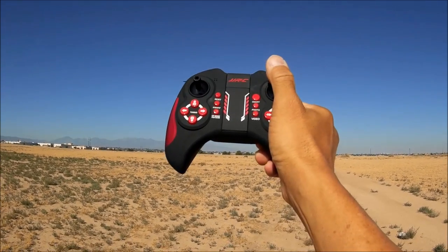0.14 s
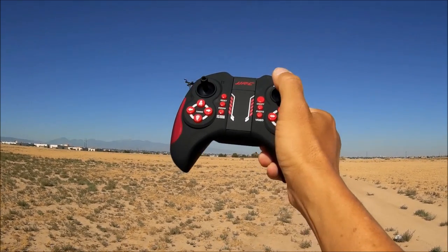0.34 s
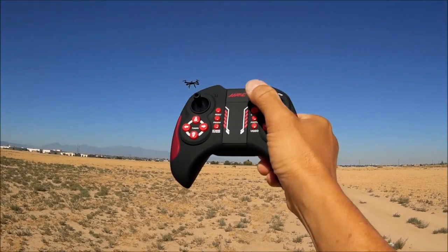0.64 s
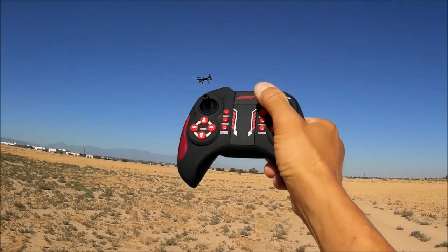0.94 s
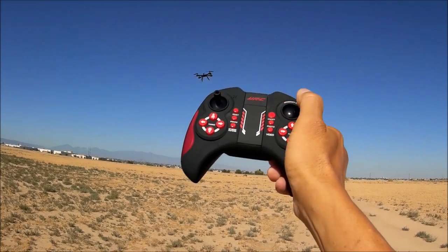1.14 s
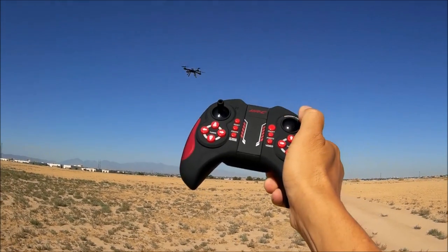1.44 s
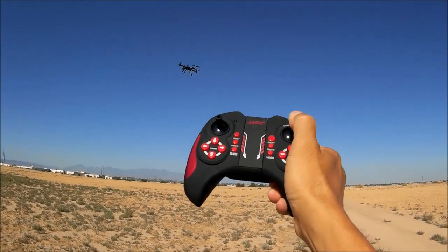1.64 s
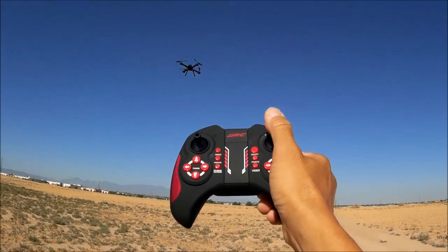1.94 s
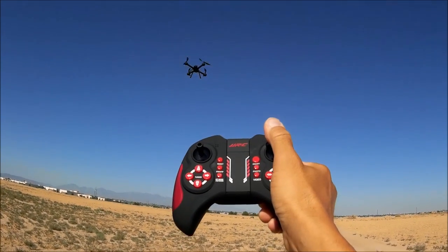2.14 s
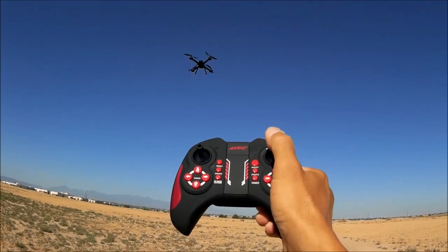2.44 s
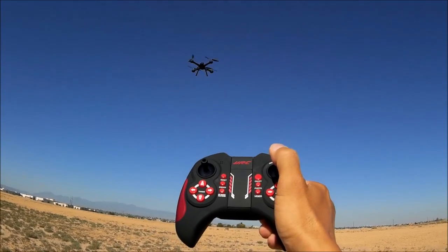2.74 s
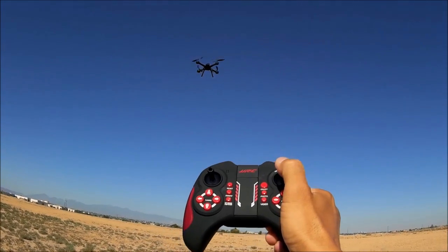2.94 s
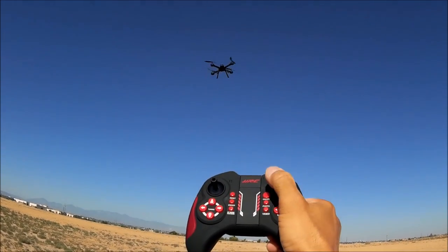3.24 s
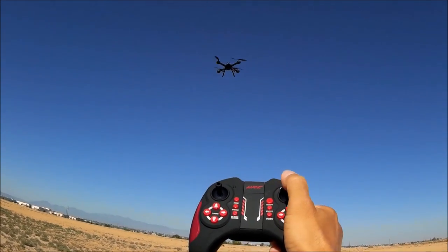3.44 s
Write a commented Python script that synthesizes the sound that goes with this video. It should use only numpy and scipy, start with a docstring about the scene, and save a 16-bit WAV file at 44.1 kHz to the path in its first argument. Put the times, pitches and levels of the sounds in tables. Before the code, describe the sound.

High wavering motor whine of a little quadcopter grows stronger, with small plastic creaks and ticks.

```python
"""A small geared quadcopter drifts closer over an open field.
From the start gear pairs whine at their tooth rate and its octave over blade hiss, chop, buzz and wash;
faint wavering hums and a wind rumble of shaped noise on the microphone lie beneath.
Soon a hand-held plastic controller near the camera creaks in bursts of small slips. Sharp ticks, short
decaying tones, follow: two probably from its sticks, later ones likely blade slaps as the craft swells."""
import sys
import numpy as np
from scipy import signal
from scipy.fft import rfft, irfft, next_fast_len
from scipy.io import wavfile
from scipy.ndimage import uniform_filter1d, map_coordinates

SR = 44100
rng = np.random.default_rng(int(sys.argv[2]) if len(sys.argv) > 2 else 0)


def makeup_ratio(level_db):
    """Linear amplitude ratio for a level in decibels (20 dB per factor of ten)."""
    decades = np.asarray(level_db, float) / 20
    return 10 ** decades


def store_pcm(level_fs):
    """Save levels as 16-bit WAV."""
    pcm = np.round(np.clip(level_fs, -1, 1) * 32767).astype(np.int16)
    wavfile.write(sys.argv[1], SR, np.atleast_2d(pcm).T)


N = 158760  # samples

# Gear mesh of the two clearest rotors, before unrest:
# (time [s], tooth rate [Hz], whine level [dB], octave level [dB])
FAST_ROTOR = [(0,3740,-60,-54),(.24,3750,-67,-55),(.38,3450,-65,-54.5),(.54,3496,-63,-54),(.64,3190,-64,-57),(.7,3540,-56,-50.5),(.8,3497,-64,-57),(1.08,3563,-54.5,-53),(1.13,3840,-63,-57),(1.24,3762,-65,-60),(1.45,3638,-61,-75),(1.55,3710,-69,-56),(1.66,3860,-52,-46),(1.74,3880,-67,-62),(2.0,3556,-62,-84),(2.2,3787,-68,-68),(2.3,3930,-52,-48),(2.45,3895,-50,-38),(2.51,4075,-56,-47),(2.56,3760,-53,-48),(2.62,3766,-55,-55),(2.68,3680,-66,-64),(2.75,3523,-47,-48),(2.85,3490,-58,-45.5),(3.1,3479,-52,-48),(3.22,3444,-54.5,-50),(3.3,3512,-47,-50),(3.4,3392,-49,-54),(3.6,3273,-54,-53)]
SLOW_ROTOR = [(0,3486,-69,-50.5),(.2,3490,-84,-64),(.28,3255,-57,-61),(.34,3330,-66,-68),(.6,3325,-63,-55),(.92,3270,-64,-54.5),(1.09,3278,-55,-56),(1.16,3250,-71,-78),(1.25,3163,-56,-58.5),(1.66,3268,-52,-50),(1.71,3020,-58,-64),(1.74,3105,-50,-51),(1.79,3460,-50.5,-46),(1.83,3390,-58,-55),(1.86,3113,-53,-56),(2.0,3195,-46.5,-51),(2.15,3320,-44,-53),(2.3,3488,-59,-58),(2.35,3650,-57,-64),(2.45,3586,-52,-65),(2.55,3478,-65,-78),(2.66,3382,-61,-47.5),(2.9,3362,-51,-48),(3.1,3338,-54,-42),(3.155,3125,-41,-47),(3.2,3390,-49,-44),(3.3,3244,-49.5,-39.5),(3.35,3490,-46,-44),(3.4,3320,-45,-49),(3.45,3196,-46,-43.5),(3.55,3270,-48,-50),(3.6,3165,-46,-53)]
# The rotor whose blades buzz most, before unrest: (time [s], blade passes [per s], buzz level [dB])
BUZZING_ROTOR = [(0, 134.5, -70), (.2, 134, -60), (.4, 133, -72), (1.2, 132, -70), (1.42, 140.6, -68),
                 (1.7, 140.5, -64), (1.9, 139, -58), (2.2, 142, -58), (2.32, 150, -48), (2.46, 151, -44.5),
                 (2.6, 146, -49), (2.68, 135, -59), (2.88, 131, -48), (3.1, 120, -57.5), (3.35, 128, -70),
                 (3.5, 124, -50)]
# The fourth rotor, near the slow one: (speed ratio [1], wander of that ratio [1],
# whine over the hiss curve [dB], octave over the hiss curve [dB])
NEARBY_ROTORS = [(.94, .012, -16, -15)]
# Air noise of the craft, before trims and unrest: (time [s], hiss [dB], low chop [dB], wash [dB])
AIR_LEVELS = [(0,-51.5,-64,-57.5),(.3,-50,-63.5,-57.5),(.64,-50.5,-65,-54.5),(.97,-49,-64.5,-58.5),(1.24,-49,-56.5,-52.5),(1.52,-47.5,-62,-58.5),(1.62,-44,-60,-54),(1.77,-43,-57,-50.5),(1.84,-49,-64,-55),(1.98,-43.5,-57,-50.5),(2.17,-40.5,-53,-50),(2.28,-43,-51,-48),(2.38,-39,-49.5,-46),(2.6,-38,-46,-43.5),(2.65,-44,-58,-52.5),(2.8,-37.5,-50.5,-45.5),(3.03,-38.5,-54,-45),(3.37,-39.5,-53,-47),(3.44,-37,-50.5,-40.5),(3.6,-39.5,-49.5,-48)]
# Relative spectra of the air noise, the hiss with the frame's resonances: (frequency [Hz], density [dB per Hz])
HISS_SPECTRUM = [(1350,-31),(2300,-8.5),(2650,-7.5),(3200,-2),(3900,-9),(4280,-6),(5180,-11),(5880,-6),(6270,-0.5),(6570,3),(6900,-0.5),(7350,-15),(7650,-1.5),(8020,-4.5),(8680,-23),(9790,-13),(10600,-19.5),(11600,-15.5),(13100,-23),(14500,-15),(15000,-27)]
CHOP_SPECTRUM = [(140, -36), (230, -10), (300, -3.5), (343, -11.5), (520, 2), (576, -1), (826, -1.5),
                 (1500, -3), (1950, -14), (3300, -120)]
PUFF_SPECTRUM = [(740, -18), (1250, -12.5), (1590, 0), (1920, -2), (2110, -0.5), (2550, -6.5), (2900, -1.5),
                 (3770, -33), (6380, -120)]
BUZZ_SPECTRUM = [(140, -39), (300, -2.5), (800, -0.5), (1300, 0), (2200, -8), (4000, -20.5)]
# Moments at which the noise is heard fainter: (time [s])
FAINT_MOMENTS = [.558, 1.819, 1.923, 2.778, 2.865, 3.421]
# Wavering tones, before swell and unrest: (frequency [Hz], pitch unrest [Hz], level [dB])
HUM_TONES = [(107.3, 18, -65), (173.4, 9.9, -62.5), (517, 11.72, -69), (1554, 45.1, -67), (2040, 45, -65),
             (2200, 45, -64)]
# Relative spectrum of the wind rumble: (frequency [Hz], density [dB per Hz])
RUMBLE_SPECTRUM = [(12, -18), (20, -5), (107, 2.5), (145, -0.5), (163, -7), (184, -5), (233, -9),
                   (313, -13.5), (348, -16.5), (520, -18), (700, -22.5), (910, -77), (1540, -120)]
# Wind level: (time [s], level [dB])
WIND_LEVELS = [(0.0, -45), (0.1, -51.5), (1.55, -50.5), (1.74, -47), (1.85, -60), (1.94, -51), (3.6, -51.5)]
# Ringing modes of the plastic, before tilt: (frequency [Hz], level [dB], 60 dB decay time [s])
PLASTIC_MODES = [(1230, -9, .014), (1650, -6, .011), (2080, 0, .007), (2700, -14, .012), (3100, -9, .009)]
# Short rattles in the plastic, probably the sticks creaking: (time [s], stroke level [dB])
STICK_CREAKS = [(.15, -39), (.285, -35), (.325, -37), (.46, -36), (.678, -34), (.852, -36), (.92, -37),
                (1.268, -33), (2.785, -29), (2.95, -32), (3.43, -29)]
# Sharp ticks near 2 kHz: the first two probably the controller's sticks, the later ones likely blade slaps:
# (time [s], level before tilt [dB], tilt [dB per octave])
SHARP_TICKS = [(0.6198, -18, 5), (1.168, -26.5, -6.5), (2.447, -19, -2), (2.583, -20, 6), (3.0151, -21, 20),
               (3.0434, -19.5, 13)]

TEETH, BLADES = 51.4, 2  # tooth contacts and blade passes per turn
JITTER_HZ, SIDEBAND_RAD = 3.5, 0.45  # tooth rate unrest, phase swing once a turn
FLICKER_DB, RASP_DB = 3, 1.5  # slow and fast unrest of the whine level
BEAT_DEPTH = 0.13 / 2  # swing of the air noise for each beat of each rotor
PULSE_SHARE, PULSE_SCATTER_DB = 0.12, 2.6  # power share of clicks in the chop, click size scatter
HUM_GROWTH = 1.3  # dB of hum per dB of wash
CREAK_S, SLIPS_PER_S, SLIP_SCATTER_DB = 0.013, 400, 3  # stroke centre to 1/e, mean slip rate, size scatter


def unit(x):
    """Scale to rms 1."""
    return x / np.sqrt(np.mean(x ** 2) + 1e-20)


def curves(rows):
    """One value per sample for each column after the time."""
    times, *columns = np.transpose(rows)
    return [np.interp(np.arange(N) / SR, times, column) for column in columns]


def bells(centres, half_width_s):
    """One bell curve of height 1 per centre, falling to 1/e at the half width."""
    t = np.arange(N) / SR
    return [np.exp(-((t - centre) / half_width_s) ** 2) for centre in centres]


def wobble(rate):
    """A smooth random curve through rate knots a second."""
    knots = rng.standard_normal(int(N * rate / SR) + 4)
    return map_coordinates(knots, [np.arange(N) * rate / SR])


def coloured(x, spectrum):
    """Filter x through a spectrum laid out over log frequency, then scale to rms 1."""
    size = next_fast_len(N + 8192)
    points_hz, points_db = np.transpose(spectrum)
    hz = np.fft.rfftfreq(size, 1 / SR)
    gain = makeup_ratio(np.interp(np.log(hz + 1), np.log(points_hz + 1), points_db))
    return unit(irfft(rfft(x, size) * gain, size)[:N])


def patchy(depth_db):
    """White noise whose gain varies in random patches of time and frequency."""
    bins = signal.stft(rng.standard_normal(N), nperseg=512)[2]
    patches = uniform_filter1d(rng.standard_normal(bins.shape), 6, 0)
    patches = uniform_filter1d(patches, 12, 1)
    return signal.istft(bins * makeup_ratio(depth_db * unit(patches)), nperseg=512)[1][:N]


def tone(phase):
    """A sine at rms 1."""
    return np.sqrt(2) * np.sin(phase)


def rotor(mesh_hz, whine_db, octave_db):
    """Gear whine with once-a-turn sidebands; also returns the shaft angle in turns."""
    turns = np.cumsum(mesh_hz) / SR / TEETH + rng.random()
    phase = 2 * np.pi * np.cumsum(mesh_hz + JITTER_HZ * wobble(120)) / SR
    phase = phase + SIDEBAND_RAD * np.sin(2 * np.pi * turns)
    whine = np.zeros(N)
    for harmonic, level_db in [(1, whine_db), (2, octave_db)]:
        unrest_db = FLICKER_DB * wobble(25.09) + RASP_DB * wobble(160)
        whine += makeup_ratio(level_db + unrest_db) * tone(harmonic * phase)
    return whine, turns


def four_rotors(hiss_db):
    """Gear trains of the fast, slow, buzzing and nearby rotors, each as (whine, turns)."""
    slow = curves(SLOW_ROTOR)
    passes = curves(BUZZING_ROTOR)[0] + 1.1 * wobble(30)
    rotors = [rotor(*curves(FAST_ROTOR)), rotor(*slow)]
    rotors.append(rotor(passes * TEETH / BLADES, hiss_db - 17, hiss_db - 14))
    for ratio, wander, whine_db, octave_db in NEARBY_ROTORS:
        mesh_hz = slow[0] * (ratio + wander * wobble(5.6))
        rotors.append(rotor(mesh_hz, hiss_db + whine_db, hiss_db + octave_db))
    return rotors


def blade_beat(rotors):
    """Gain that swings once a turn and once a blade pass of each rotor."""
    swings = [np.cos(2 * np.pi * turns) + np.cos(2 * np.pi * BLADES * turns) for _, turns in rotors]
    return 1 + BEAT_DEPTH * sum(swings)


def blade_pulses(turns):
    """One click of uneven size for each blade pass."""
    clicks = np.zeros(N)
    passes = np.flatnonzero(np.diff(np.floor(BLADES * turns)))
    clicks[passes] = makeup_ratio(PULSE_SCATTER_DB * rng.standard_normal(len(passes)))
    return clicks - clicks.mean()


def blade_hiss(beat, level_db):
    """Broad blade noise, beating with the rotors and coloured by the frame."""
    return coloured(beat * patchy(1.92), HISS_SPECTRUM) * makeup_ratio(level_db - 1.5 + 0.36 * wobble(6.2))


def blade_chop(beat, turns, level_db):
    """Low chop: beating noise mixed by power with one rotor's blade clicks."""
    clicks = np.sqrt(PULSE_SHARE) * unit(blade_pulses(turns))
    noise = np.sqrt(1 - PULSE_SHARE) * unit(beat * patchy(0.46))
    return coloured(clicks + noise, CHOP_SPECTRUM) * makeup_ratio(level_db - 1 + 1.25 * wobble(12))


def wash_puffs(beat, level_db):
    """Puffs of wash: beating mid-band noise with a quick random swell."""
    return coloured(beat * patchy(2.57), PUFF_SPECTRUM) * makeup_ratio(level_db + 0.5 + 1.5 * wobble(29.91))


def blade_buzz(turns):
    """Buzz of one rotor: its blade clicks, coloured."""
    buzz_db = curves(BUZZING_ROTOR)[1]
    return coloured(blade_pulses(turns), BUZZ_SPECTRUM) * makeup_ratio(buzz_db)


def craft():
    """Four geared rotors: returns their whines, and their hiss, chop, wash and buzz."""
    hiss_db, chop_db, wash_db = curves(AIR_LEVELS)
    rotors = four_rotors(hiss_db)
    slow_turns, buzzing_turns = rotors[1][1], rotors[2][1]
    beat = blade_beat(rotors)
    shake_db = 0.92 * wobble(35.17)  # shared by hiss, chop and wash
    noise = blade_hiss(beat, hiss_db + shake_db)
    noise = noise + blade_chop(beat, slow_turns, chop_db + shake_db)
    noise = noise + wash_puffs(beat, wash_db + shake_db)
    noise = noise + blade_buzz(buzzing_turns)
    return sum(whine for whine, _ in rotors), noise


def hums():
    """Faint tones wavering about fixed pitches; those above 300 Hz swell with the wash."""
    wash_db = curves(AIR_LEVELS)[2]
    swell_db = HUM_GROWTH * (wash_db - wash_db.mean())
    out = np.zeros(N)
    for hz, unrest_hz, level_db in HUM_TONES:
        level_db = level_db + (hz > 300) * swell_db + 4.75 * wobble(20.987)
        phase = 2 * np.pi * np.cumsum(hz + unrest_hz * wobble(60)) / SR
        out += makeup_ratio(level_db) * tone(phase)
    return out


def wind():
    """Low wind rumble on the microphone: slightly patchy noise, coloured."""
    level_db, = curves(WIND_LEVELS)
    return coloured(patchy(0.77), RUMBLE_SPECTRUM) * makeup_ratio(level_db)


def short_ring(tilt_db):
    """Decaying modes of the plastic, tilted in dB per octave about 2 kHz; every tick borrows them."""
    t = np.arange(SR // 20) / SR
    modes = np.zeros(len(t))
    for hz, level_db, t60 in PLASTIC_MODES:
        decay_db = level_db + tilt_db * np.log2(hz / 2000) - 60 * t / t60
        modes += makeup_ratio(decay_db) * np.sin(2 * np.pi * hz * t)
    return modes * (1 - np.exp(-t / 0.00078))  # soft onset


def creaks():
    """Stick-slip creaks: many small uneven slips under a stroke, each ringing the plastic."""
    centres, levels_db = np.transpose(STICK_CREAKS)
    stroke = sum(makeup_ratio(db) * bell for db, bell in zip(levels_db, bells(centres, CREAK_S)))
    slips = (rng.random(N) < SLIPS_PER_S / SR) * makeup_ratio(SLIP_SCATTER_DB * rng.standard_normal(N))
    return signal.fftconvolve(stroke * slips, short_ring(9))[:N]


def faint_moments():
    """Gain for a level that briefly sinks by 15 dB and returns, along a bell curve in dB."""
    return makeup_ratio(-15 * sum(bells(FAINT_MOMENTS, 0.0073)))


def ticks():
    """Sharp ticks, first probably sticks and later likely blade slaps: short rings of varied brightness."""
    out = np.zeros(N)
    for start, level_db, tilt_db in SHARP_TICKS:
        out[round(start * SR):][:SR // 20] += makeup_ratio(level_db) * short_ring(tilt_db)
    return out


def scene():
    """Craft, hums, wind, creaks and ticks, in mono."""
    whines, noise = craft()
    heard_noise = faint_moments() * noise
    return (whines + heard_noise + hums() + wind() + creaks() + ticks())[None]


def roll_off(x):
    """The treble ends steeply here."""
    return signal.sosfilt(signal.butter(12, 16080, fs=SR, output="sos"), x)


def record(dry):
    """The camera's band limit, a steep roll-off around 15.3 kHz."""
    size = next_fast_len(N + 8192)
    hz = np.fft.rfftfreq(size, 1 / SR)
    mix = irfft(rfft(dry, size) / (1 + (hz / 15300) ** 90), size)[:, :N]
    return roll_off(mix)


dry = scene()
out = record(dry)
store_pcm(out)
```